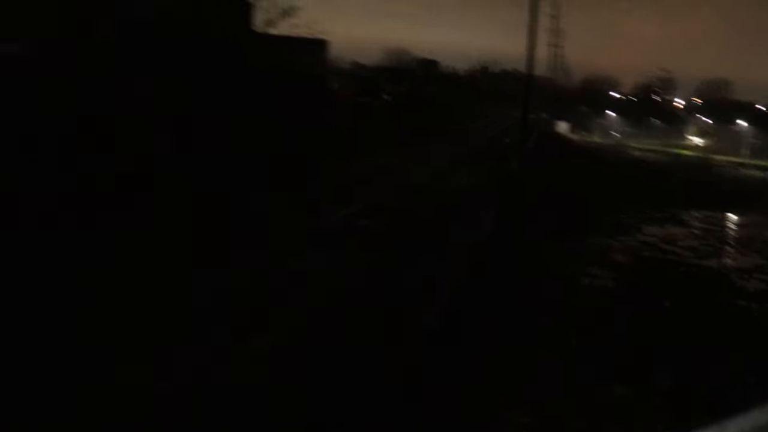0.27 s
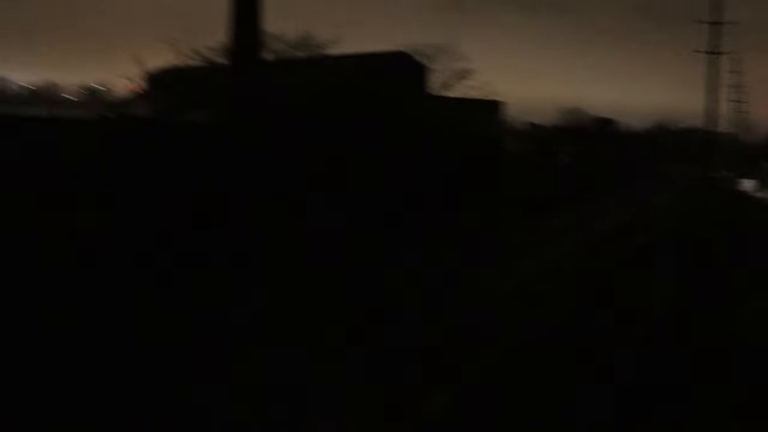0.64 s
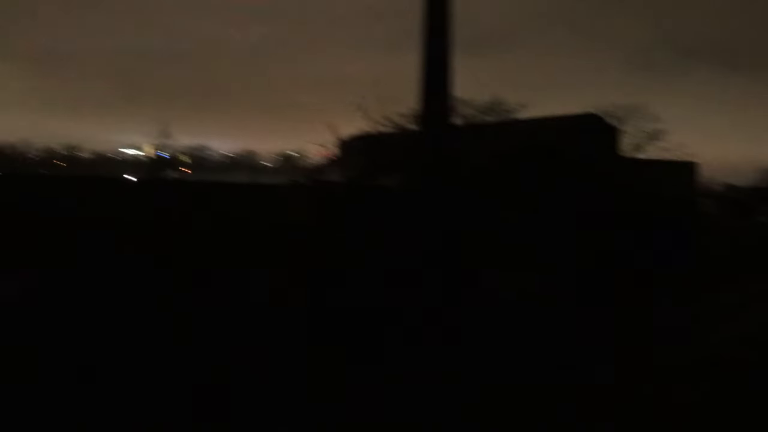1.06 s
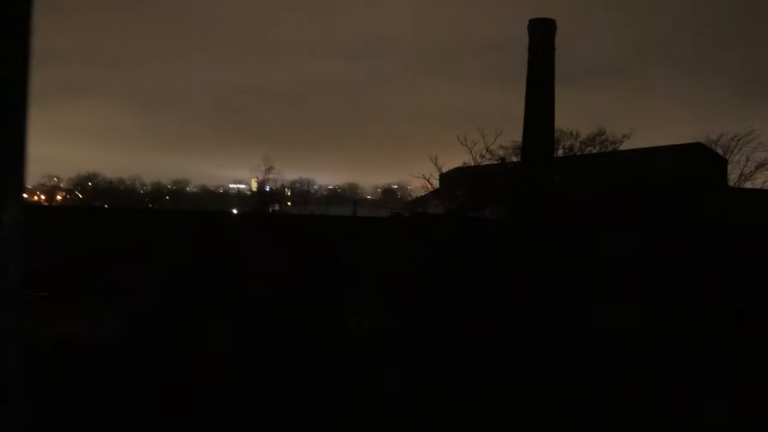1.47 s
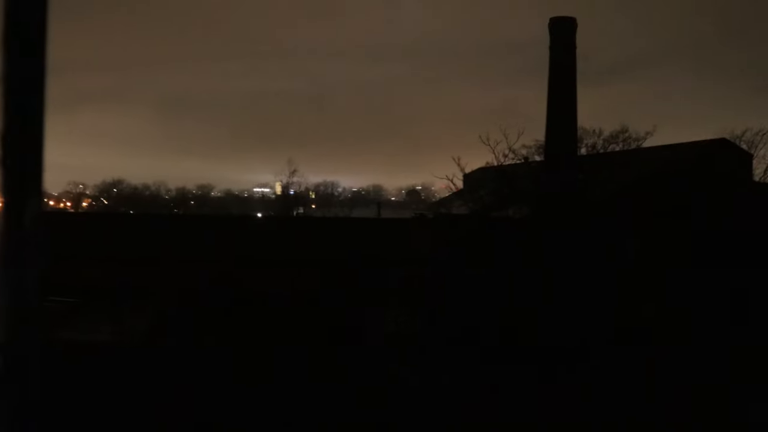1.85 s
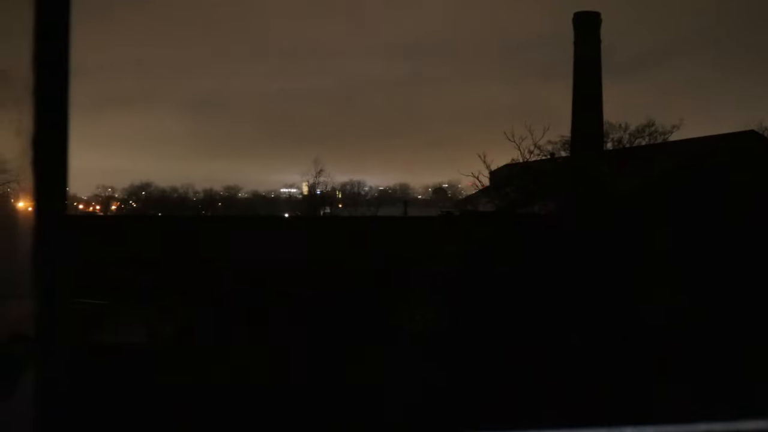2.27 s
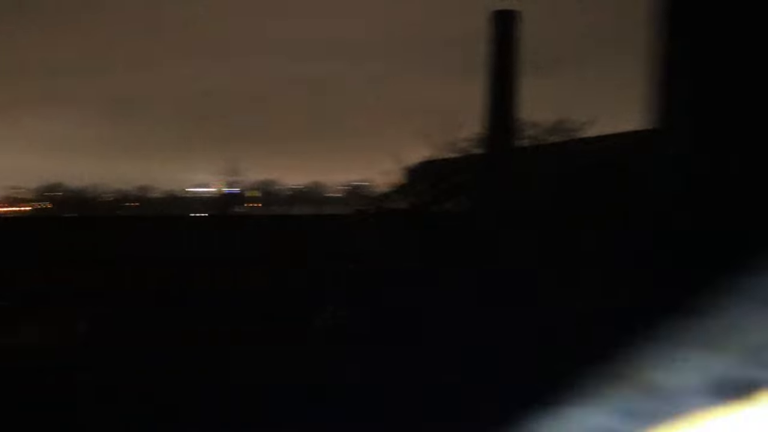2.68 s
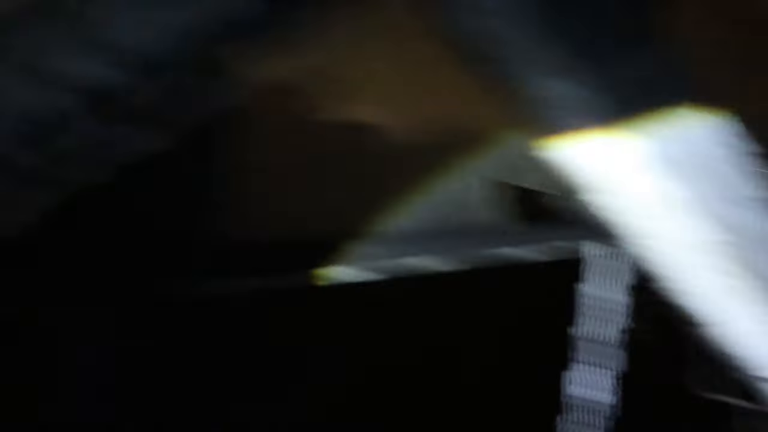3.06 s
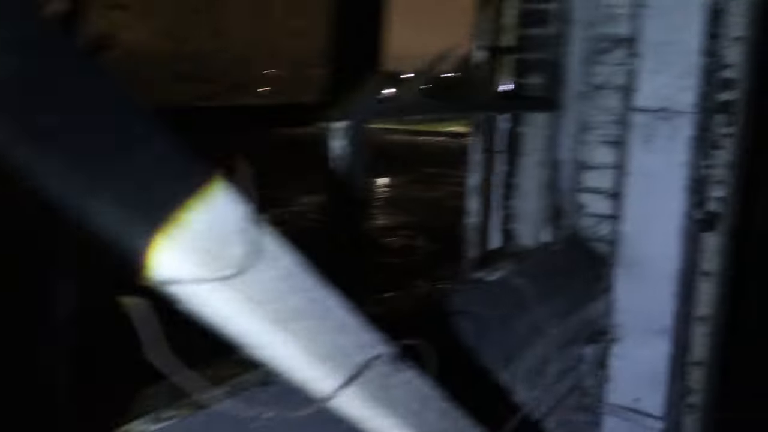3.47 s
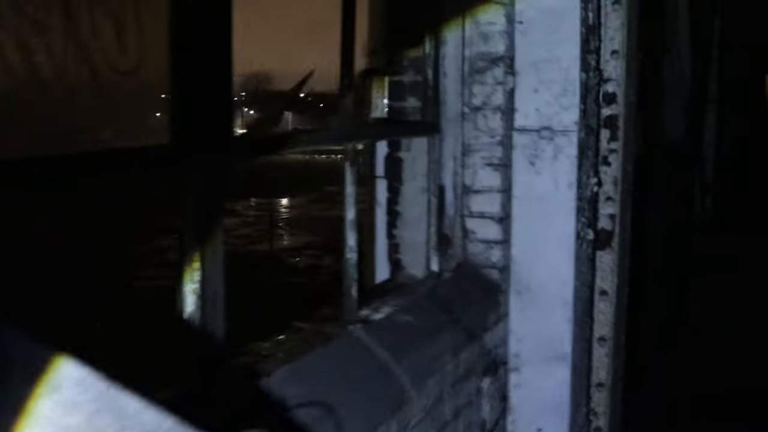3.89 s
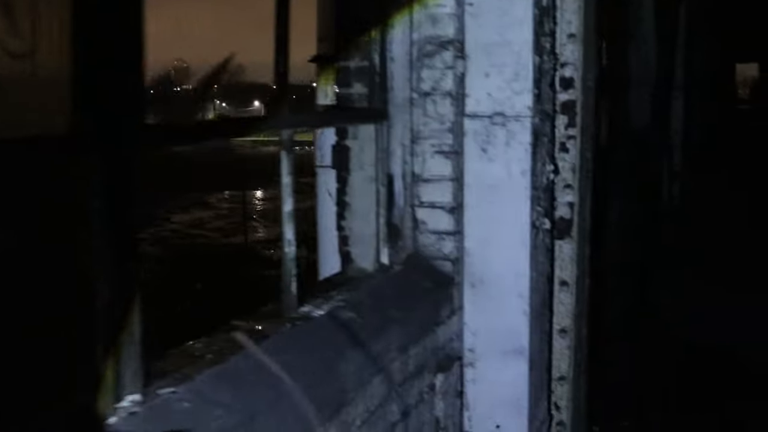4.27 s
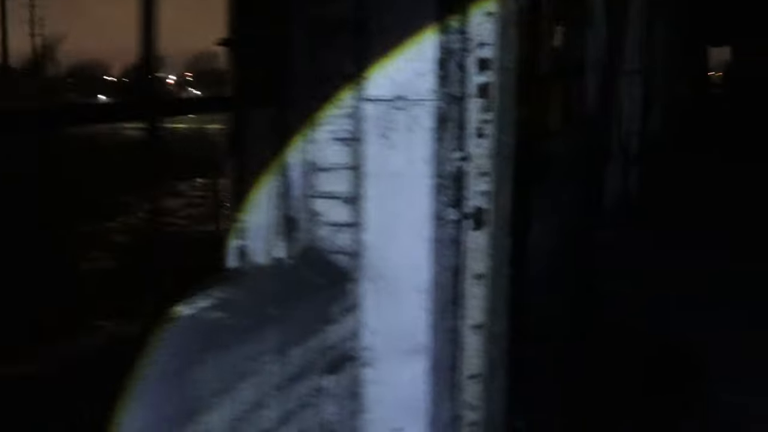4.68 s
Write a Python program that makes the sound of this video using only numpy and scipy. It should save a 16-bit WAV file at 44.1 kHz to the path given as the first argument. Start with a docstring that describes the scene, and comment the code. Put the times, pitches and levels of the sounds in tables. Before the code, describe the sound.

Slow footsteps cross broken glass and rubble in a large empty factory hall, close to the microphone, the far walls ringing on after each sound. A distant town gives a faint, steady hiss and low hum throughout. At about 0.2 seconds a loose shard clinks and grit grinds under the sole. From 0.7 seconds pieces of glass snap underfoot with a dull heel knock, and sharper cracks follow near 1.2 and 1.8 seconds. Around 2.4 seconds a shard chatters on the concrete while the heel bumps rubble. A short lull lasts from about 2.7 to 3.2 seconds, ended by a bright clink and a knock. The heaviest steps follow: a thick run of cracks, gritty grinding and clinks from 3.5 to 4 seconds, then another from 4.2, loudest around 4.5 with a ringing shard and a solid knock. The last cracks come near 4.8 seconds.

```python
"""Slow steps over broken glass and rubble in a large empty factory hall, at night, on one microphone.
The distant town murmurs from the start. Close by, a loose shard clinks and grit grinds under the sole;
then pinned pieces snap and the heel knocks rubble onto the concrete, the far walls ringing on after each.
After a lull near 3 s come the heaviest steps, a thick run of cracks and clinks almost to the end."""
import sys
import numpy as np
from scipy import signal
from scipy.fft import rfft, irfft
from scipy.io import wavfile

SR = 44100
rng = np.random.default_rng(int(sys.argv[2]) if len(sys.argv) > 2 else 0)


def materialize(psi):
    """Save the field psi as 16-bit PCM at rate SR to the path in sys.argv[1].

    A 1-D psi becomes a single channel; in a 2-D psi each row is a channel.
    """
    bounded = np.clip(np.atleast_2d(psi).T, -1, 1)
    quanta = np.round(bounded * 32767).astype(np.int16)
    wavfile.write(sys.argv[1], SR, quanta)


N = 212982

# spectrum of the distant town's hiss: (frequency [Hz], level [dB])
TOWN_SPECTRUM = [(20, -15), (50, -12), (100, -8), (160, -11), (270, -13), (450, -16), (600, -19),
                 (1000, -21.5), (2000, -24), (4200, -27), (5400, -32.5), (6300, -37), (16000, -56)]
# modes of each loose shard, by name: (frequency [Hz], level [dB], t60 [s])
SHARD_MODES = { "strip": [(3260, 0.5, 0.24), (4200, 3.5, 0.048), (4840, -10, .04), (5800, -1.5, 0.07),
               (8629, -15.5, 0.3)], "wedge": [(3550, 4.5, 0.038), (4310, 9, 0.019), (5610, 12, 0.037),
               (6400, 0, 0.034), (12500, -2, 0.026), (15140, -7, .06)], "chip": [(3280, 7, 0.014),
               (7553, -3, 0.28), (10800, -12, 0.12), (12900, -6, 0.097)], "speck": [(9540, 13, 0.006),
               (12900, -5, 0.011), (14000, 1, .01), (15100, -6, .012)], "flake": [(7500, -9, 0.013),
               (7820, 9, 0.0084), (8240, 4, .014)], "blade": [(2518, -1.5, 0.034), (3010, 5.5, 0.03),
               (3820, -0.5, 0.025), (6050, -10.5, 0.037), (12200, -20, 0.077)], "plate": [(2910, 19, 0.052),
               (3830, -12, 0.079), (6400, 6, 0.13), (7200, 7, 0.37), (8958, -7, 0.09), (13000, -5, .13)],
               "pane": [(2633, -4, 0.044), (3860, -14, 0.034), (4200, -10, 0.017), (5500, -19.5, 0.02),
               (6800, -27, 0.067), (8100, -23.5, 0.12), (11200, -27.5, 0.092)],
               "sliver": [(3820, 2.5, 0.024), (6860, -6, 0.098), (8600, 0, 0.19), (9610, -4, 0.11),
               (13000, -7.5, .07)]}
# shards knocked against the floor: (time [s], shard name, level [dB], chatter t60 [s])
SHARD_LANDINGS = [(.092, "strip", -29, .1), (.240, "strip", -10.5, 0.035), (.271, "strip", -11, 0.037),
                  (.636, "blade", -16, .06), (1.0435, "flake", -11, 0.008), (1.099, "flake", -24, 0.025),
                  (1.2228, "flake", -12.5, 0.0071), (1.347, "speck", -36, .008),
                  (1.905, "speck", -22.5, 0.013), (2.36, "wedge", -17, 0.021),
                  (2.393, "wedge", -12.5, 0.062), (2.433, "wedge", -16, .06),
                  (2.458, "wedge", -10.5, 0.075), (2.475, "speck", -23.5, 0.027),
                  (2.512, "wedge", -12.5, 0.032), (2.649, "chip", -15.5, 0.013),
                  (3.222, "blade", -17, 0.054), (3.2292, "blade", -2.5, 0.013),
                  (3.306, "blade", -12.5, .024), (3.858, "sliver", -11, 0.092),
                  (3.911, "plate", -5.5, 0.067), (3.929, "sliver", -7, 0.06), (3.951, "plate", -11, .056),
                  (3.999, "plate", -3.5, 0.011), (4.448, "pane", 7, 0.051), (4.611, "speck", -14, .015),
                  (4.699, "sliver", -11.5, .04), (4.751, "sliver", -11, 0.088)]
# pieces snapping under the sole: (time [s], pitch [Hz], glass ring [dB], rubble clack [dB], splinters [dB])
GLASS_BREAKS = [(0.6828, 3460, -11, -17.5, -19), (0.775, 4860, -14, -18.5, -21.5),
                (0.9062, 4370, -10, -19.5, -28), (0.9145, 2310, -14, -7.5, -19.5),
                (.926, 2420, -29, -14, -37), (1.0, 2470, -24, -12, -25.5),
                (1.2003, 4130, -4.5, -17.5, -8.5), (1.363, 4900, -21, -52, -26.5),
                (1.533, 3860, -17, -59, -25.5), (1.754, 3620, 1.5, -13.5, -12.5),
                (1.771, 2870, -0.5, -17, -8), (1.865, 4400, -12.5, -24, -25),
                (1.934, 5160, -14.5, -19, -23), (2.128, 4300, -15.5, -28, -24),
                (2.267, 4650, -16, -31, -22), (2.395, 5600, -25, -27, -22), (2.441, 4470, -20, -40, -17),
                (2.579, 3550, -22.5, -32, -25.5), (3.398, 4940, -18, -33, -31),
                (3.459, 4700, -13.5, -22.5, -20.5), (3.551, 4800, -16.5, -20, -34),
                (3.566, 5200, -13, -14, -28), (3.656, 3460, -20, -18, -36),
                (3.672, 3580, -10.5, -13.5, -20), (3.708, 3570, -5, -4.5, -18.5),
                (3.758, 3680, -5, -10, -14.5), (3.778, 3840, 0, -2.5, -11), (3.811, 3640, -10, -5, -18),
                (3.913, 4060, -6, -31, -8), (4.21, 5200, -14.5, -18, -22), (4.249, 3820, -5, -13, -18.5),
                (4.261, 4200, -12.5, -21, -17.5), (4.334, 2300, -12.5, -17.5, -22.5),
                (4.359, 2950, -13, -37, -34), (4.4819, 2720, -6, -1, -20), (4.4933, 2540, -24, -1.5, -22),
                (4.6022, 3910, 4, -8, -8), (4.611, 5830, -6, -15, -11), (4.749, 2155, -4, -30, -24),
                (4.765, 2070, -7.5, -21, -18)]
# modes of the loose rubble under the glass: (frequency [Hz], level [dB], t60 [s])
RUBBLE_MODES = [(1315, -0.5, 0.01), (1420, -1.5, 0.012), (1675, -2.5, 0.035), (1896, 0.5, 0.022),
                (2300, 2, 0.012)]
# the tail from the far walls: (frequency [Hz], level [dB], t60 [s])
HALL_TAIL = [(100, -0.5, 3.9), (500, 7, 2.56), (1450, 7, 1.37), (2820, 2.5, 1.52), (4700, 5.5, 0.68),
             (8160, 6, 0.8), (15300, 1, 0.28)]
# the sole presses and turns on the grit: (time [s], hold [s], level [dB])
SOLE_SCRAPES = [(0.234, 0.019, -52), (0.63, .14, -47.5), (0.923, 0.17, -54), (1.786, .17, -62),
                (2.383, 0.047, -51), (3.241, 0.032, -45), (3.461, .03, -52), (3.551, 0.019, -48.5),
                (3.706, .22, -40), (4.006, 0.018, -43.5), (4.351, 0.023, -47), (4.466, 0.38, -50.5),
                (4.749, 0.025, -40)]
# tone colour of the grinding grit: (frequency [Hz], level [dB])
GRIT_SPECTRUM = [(300, -21), (800, -20), (1600, -4.5), (3000, 7), (4500, 5.5), (7000, -0.5), (10000, -7.5),
                 (16000, -26)]
# the heel's weight landing on rubble: (time [s], level [dB], pitch [Hz])
HEEL_KNOCKS = [(.701, -15.5, 370), (2.425, -19.5, 697), (2.447, -20.5, 620), (2.508, -22, 630),
               (3.265, -19, 690), (3.7035, -8.5, 965), (3.778, -24, 580), (3.812, -15, 710),
               (4.334, -20.5, 500), (4.4825, -4.5, 813), (4.565, -23, 278), (4.604, -14, 290)]

PRESS_S, LIFT_T60_S = 0.036, 0.58  # the weight comes on quickly and eases off slowly


def undb(db):
    """Decibels to gain."""
    return 10 ** (np.asarray(db) / 20)


def unit(x):
    """Scale to an energy of one."""
    return x / np.sqrt(np.sum(x ** 2) + 1e-18)


def fade(t, t60):
    """Exponential decay, 60 dB down after t60."""
    return np.exp(-np.log(1000) * t / np.maximum(t60, 1e-3))


def add(out, s, x):
    """Mix x into out from time s on."""
    i = int(np.clip(s * SR, 0, N - 1))
    out[i:i + len(x)] += x[:N - i]


def band(x, lo_hz, hi_hz, order=2):
    """Causal band-pass."""
    hi_hz = min(hi_hz, SR / 2 - 1000)
    lo_hz = min(lo_hz, hi_hz * 0.88)
    return signal.sosfilt(signal.butter(order, [lo_hz, hi_hz], "band", fs=SR, output="sos"), x)


def colour(x, points):
    """Filter by a spectrum of (frequency [Hz], level [dB]) points, keeping the power of white noise."""
    hz, db = np.transpose(points)[:2]
    bins_hz = np.fft.rfftfreq(len(x), 1 / SR)
    gain = undb(np.interp(np.log(bins_hz + 1), np.log(hz), db))
    return irfft(rfft(x) * gain / np.sqrt(np.mean(gain ** 2)), len(x))


def ring(t, modes):
    """Damped modes (frequency [Hz], level [dB], t60 [s]), each struck with a random sign."""
    return sum(rng.choice([-1, 1]) * undb(db) * np.sin(2 * np.pi * hz * t) * fade(t, t60)
               for hz, db, t60 in modes)


def distant_town(hiss_db=-52, hum_hz=160, hum_db=-64, rumble_db=-57):
    """The town, far off through the open walls: even hiss, a wavering hum and a deep rumble."""
    hiss, hum, rumble = rng.standard_normal((3, N))
    hiss = colour(hiss, TOWN_SPECTRUM)
    hum = band(hum, hum_hz - 4, hum_hz + 4)
    rumble = band(rumble, 24.5, 40.4, order=3)
    return undb(hiss_db) * hiss + undb(hum_db) * hum / np.std(hum) + undb(rumble_db) * rumble / np.std(rumble)


def clinks(tick=0.28, detune=0.0074, touch_db=-3.0, slip_s=0.005, slip_db=-8.5):
    """A loose shard slips with a faint scrape, rings freely and chatters on the concrete as it settles."""
    out, t = np.zeros(N), np.arange(SR // 5) / SR
    for s, shard, db, chatter_t60 in SHARD_LANDINGS:
        chatter = unit(rng.standard_normal(len(t)) ** 3 * fade(t, chatter_t60))
        landing = (t == 0) + 1.9 * chatter
        slip = undb(slip_db) * unit(rng.standard_normal(len(t)) * (t < slip_s))
        contact = slip + np.roll(landing, int(slip_s * SR))
        tone = 0
        for hz, mode_db, t60 in SHARD_MODES[shard]:
            # every landing supports the shard differently, shifting and weighting its modes a little
            mode = ring(t, [(hz * (1 + detune * rng.uniform(-1.09, 1)), 0, t60)])
            weight = undb(mode_db + touch_db * rng.standard_normal())
            tone = tone + weight * unit(signal.fftconvolve(contact, mode)[:len(t)])
        clink = unit(tone) + tick * unit(band(contact, 4400, 7500))
        add(out, s - slip_s, undb(db) * clink)
    return out


def small_breaks(release_db=-16, crumbs=3, crumb_hz=3686, over_grit_db=23.5, spread_db=6.5):
    """A snap frees each shard, and a few crumbs give way in each scrape; rows as in GLASS_BREAKS."""
    breaks = [(s, SHARD_MODES[shard][0][0], db + release_db) for s, shard, db, _ in SHARD_LANDINGS]
    for s, hold_s, db in SOLE_SCRAPES:
        for when, octave, strength in rng.uniform(-1, 1, (crumbs, 3)):
            crumb_s = s + (hold_s + PRESS_S) * (when + 1) / 2
            breaks.append((crumb_s, crumb_hz * 2 ** (octave / 2), db + over_grit_db + spread_db * strength))
    return [(s, hz, db, db - 12.5, db - 11.5) for s, hz, db in breaks]  # clack and splinters under the ring


def fracture(t, run_s, build=0.18):
    """A break runs in jerks that build up within a millisecond or two and die away."""
    return unit(rng.standard_normal(len(t)) ** 3 * fade(t, run_s) * (1 - fade(t, build * run_s)))


def cracks(pinned_cycles=109, rubble_damping=0.77, neighbour_db=-4, splinter_t60=0.0021):
    """Each break rings the glass, clacks the rubble and throws splinters: (to microphone, into hall)."""
    direct, around, t = np.zeros(N), np.zeros(N), np.arange(SR // 14) / SR
    for s, hz, ring_db, clack_db, splinter_db in GLASS_BREAKS + small_breaks():
        # small, high pieces stop soonest, and sooner still when crushed against rubble
        t60 = pinned_cycles / hz / (1 + rubble_damping * min(undb(clack_db - ring_db), 1))
        jerks = fracture(t, 0.97 * t60)
        # the sole damps the piece: one clear mode among uneven neighbours
        neighbours = [(hz * ratio, neighbour_db, t60 / 2) for ratio in rng.uniform(.85, 1.45, size=5)]
        modes = [(hz, 0, t60)] + neighbours
        body = unit(signal.fftconvolve(fracture(t, t60 / 2), ring(t, modes))[:len(t)])
        snap = unit(band(jerks, hz * .76, hz * 1.35))
        stone_modes = [(f * rng.uniform(.92, 1.08), db, decay) for f, db, decay in RUBBLE_MODES]
        rubble = unit(unit(ring(t, stone_modes)) + 0.94 * unit(band(jerks, 1204, 2050)))
        splinter_modes = [(f, 0, splinter_t60) for f in rng.uniform(7500, 14000, size=5)]
        spray = unit(ring(t, splinter_modes)) / 2 + unit(band(jerks, 6800, 12500))
        splinters = undb(splinter_db) * unit(spray)
        add(direct, s, undb(clack_db) * rubble + splinters + undb(ring_db) * unit(snap + 0.94 * body))
        # each direction hears other modes, so their sum in the hall is smoother
        clatter = unit(band(fracture(t, t60), 1155, 2180))
        add(around, s, undb(clack_db) * clatter + splinters + undb(ring_db) * unit(snap + body / 4))
    return direct, around


def hall(x, near_db=-6.5, near_t60=0.12, far_db=-12.5, build_s=0.0088):
    """Floor and nearby pillars answer at once; the far walls give a long tail that loses its treble."""
    t = np.arange(int(1.2 * SR)) / SR
    hz, _, t60 = np.transpose(HALL_TAIL)
    edges_hz = np.geomspace(80, 17000, 13)
    tail = 0
    for lo, hi in zip(edges_hz, edges_hz[1:]):
        band_t60 = np.interp(np.log(lo * hi) / 2, np.log(hz), t60)
        tail = tail + band(rng.standard_normal(len(t)), lo, hi, order=3) * fade(t, band_t60)
    tail = colour(unit(tail), HALL_TAIL) * (1 - np.exp(-t / build_s))
    near = unit(rng.standard_normal(len(t)) ** 5 * fade(t, near_t60) * (t > .002))
    return signal.fftconvolve(x, undb(near_db) * near + undb(far_db) * tail)[:N]


def sole_pressure():
    """Strength of the grinding: each scrape swells, holds and dies away."""
    pressure, t = np.zeros(N), np.arange(N) / SR
    for s, hold_s, db in SOLE_SCRAPES:
        press = np.clip(1 + (t - s) / PRESS_S, 0, 1) ** 2
        lift = fade(np.maximum(t - s - hold_s, 0), LIFT_T60_S)
        pressure = np.maximum(pressure, undb(db) * press * lift)
    return pressure


def grit(grains_per_s=2000, spread_db=3.5, pitches=60):
    """Tiny grains burst under the turning sole, a few large among many small."""
    strengths = undb(spread_db * np.minimum(rng.exponential(size=N), 4)) * rng.choice([-1, 1], N)
    pops = strengths * (rng.random(N) < grains_per_s / SR)
    kind = rng.integers(0, pitches, N)
    grains, t = np.zeros(N), np.arange(SR // 100) / SR
    for k, hz in enumerate(np.linspace(300, 16000, pitches)):
        # every size of grain rings briefly at its own pitch, with a dry crackle
        grain = unit(ring(t, [(hz, 0, .009)])) + unit(rng.standard_normal(len(t)) * fade(t, .008))
        grains += signal.oaconvolve(pops * (kind == k), grain)[:N]
    return colour(grains / np.std(grains), GRIT_SPECTRUM) * sole_pressure()


def heel_knocks(ring_cycles=24, run_s=0.041, hollow=0.93):
    """The heel pushes a lump of rubble onto the floor: a dull knock, longer the lower it is."""
    out, t = np.zeros(N), np.arange(SR // 8) / SR
    for s, db, hz in HEEL_KNOCKS:
        thud = unit(band(fracture(t, run_s, build=0.039), hz * 0.29, hz * 1.78))
        tone = unit(ring(t, [(hz, 0, ring_cycles / hz)]))
        add(out, s, undb(db) * unit(thud + hollow * tone))
    return out


def scene():
    """The steps reach the microphone directly and by way of the hall, with the town far behind."""
    cracks_direct, cracks_around = cracks()
    shoe = heel_knocks() + grit()
    clinks_around = undb(-1) * clinks(tick=0.38, detune=0.0115)  # shards blend rougher in the hall
    direct = cracks_direct + clinks() + shoe
    reflected = hall(cracks_around + clinks_around + shoe)
    return (direct + reflected + distant_town())[None]


def record(dry, top_hz=16000):
    """The camera cuts the top of the treble from its microphone."""
    return signal.sosfilt(signal.ellip(8, .2, 70, top_hz, fs=SR, output="sos"), dry)


dry = scene()
out = record(dry)
materialize(out)
```